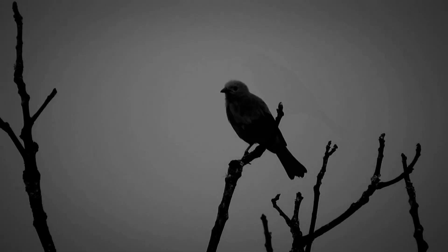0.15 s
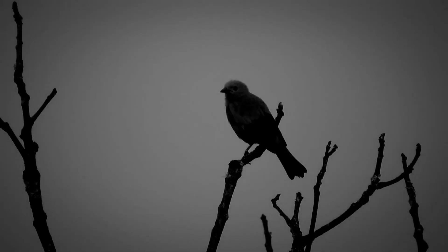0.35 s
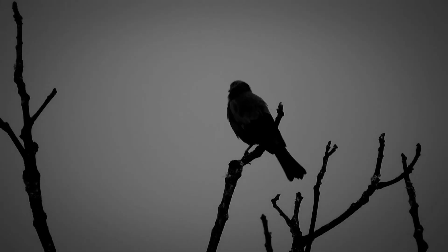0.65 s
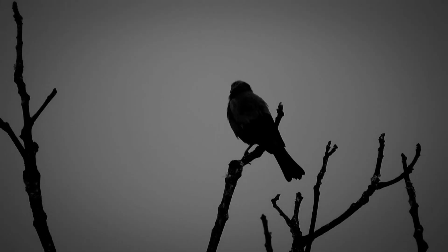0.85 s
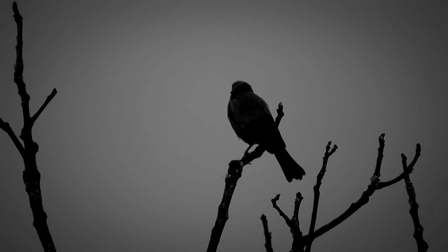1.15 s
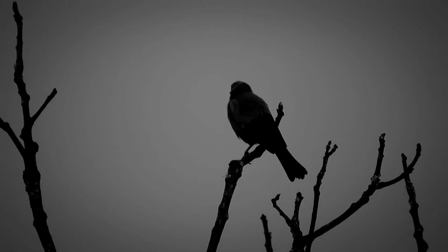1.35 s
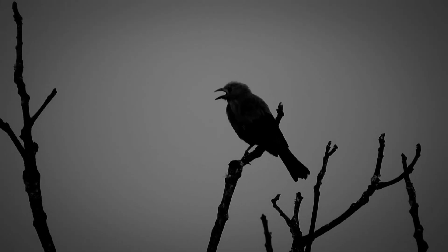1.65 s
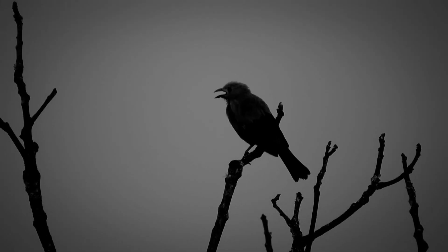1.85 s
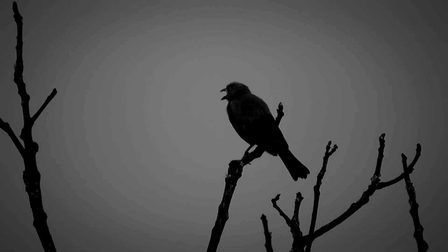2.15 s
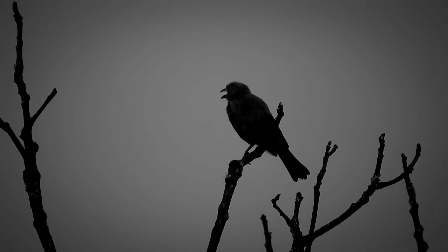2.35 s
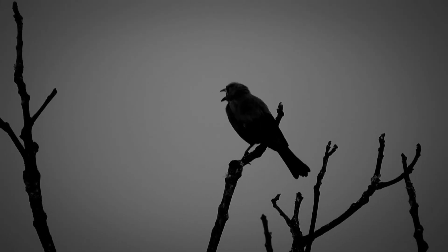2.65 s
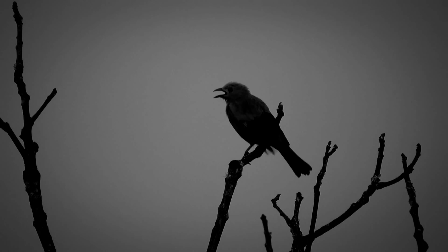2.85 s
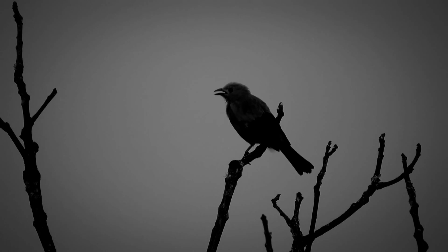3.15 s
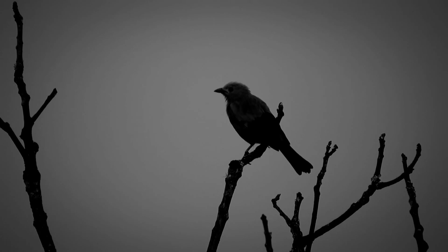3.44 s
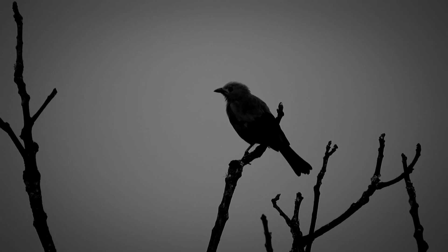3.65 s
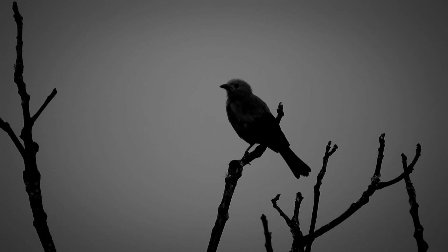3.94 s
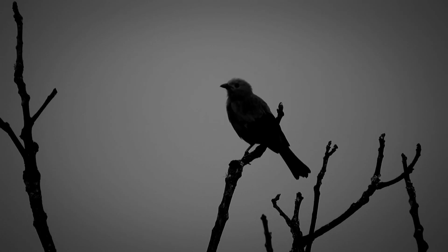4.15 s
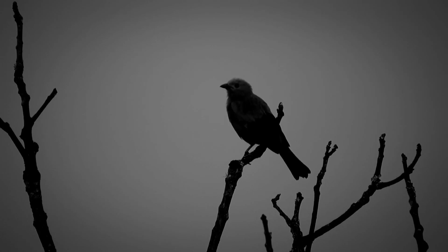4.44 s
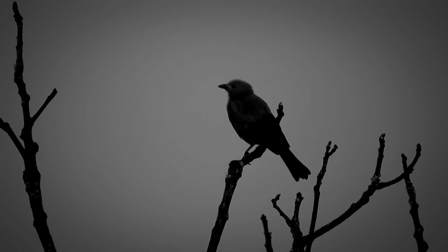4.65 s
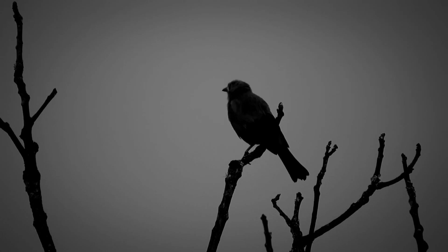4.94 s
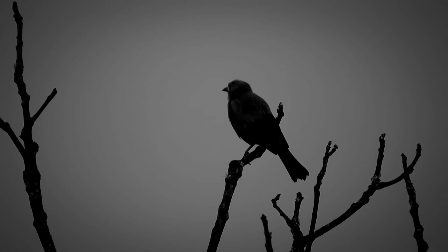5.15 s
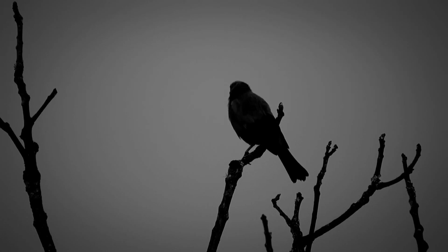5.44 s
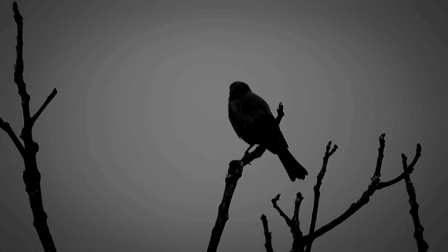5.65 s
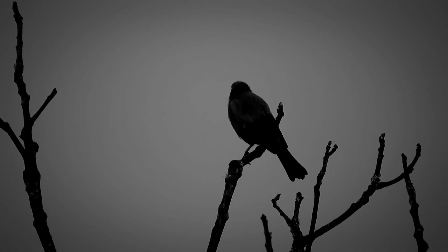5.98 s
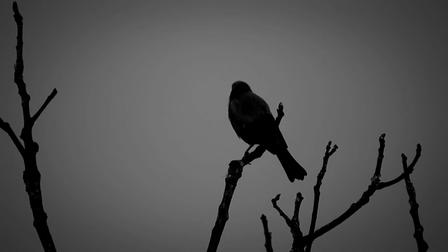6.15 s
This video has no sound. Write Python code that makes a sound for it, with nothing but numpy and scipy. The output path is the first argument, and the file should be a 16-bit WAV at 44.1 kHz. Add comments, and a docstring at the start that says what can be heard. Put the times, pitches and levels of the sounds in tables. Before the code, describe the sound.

Two rattling trills of short, piercing chirps from a nearby small bird, split by a pause with sharp ticks, above a faint hum.

```python
"""Outdoors among foliage, one microphone close to a prinia, over a low rumble and a faint hum.
The bird sings two runs of about nine notes a second, each a steep downward whistle of some 40 ms
made as its syrinx slackens. In the pause come three sharp ticks and a few slower notes, and
another bird calls faintly far off. The surroundings scatter each note into a short tail."""
import sys
import numpy as np
from scipy import signal
from scipy.fft import rfft, irfft
from scipy.io import wavfile
from scipy.ndimage import map_coordinates

SR = 44100
rng = np.random.default_rng(int(sys.argv[2]) if len(sys.argv) > 2 else 0)


def waveform_to_disk(signal):
    """Save audio, clipped to [-1, 1], as 16-bit WAV at the path in sys.argv[1]."""
    frames = np.transpose(np.atleast_2d(signal))
    scaled = np.clip(frames, -1, 1) * 32767
    samples = np.round(scaled).astype(np.int16)
    wavfile.write(sys.argv[1], SR, samples)


N = 278271
TIME = np.arange(N) / SR


def from_db(db):
    """Decibels to gain."""
    return 10 ** (np.asarray(db) / 20)


def rms_one(x):
    """Scale to unit power."""
    return x / np.sqrt(np.mean(x ** 2) + 1e-20)


def at_hz(points, hz):
    """Gain from rows of frequency_hz, gain_db, read on a log-frequency axis."""
    freqs, levels = np.transpose(points)
    return from_db(np.interp(np.log(np.maximum(hz, 1)), np.log(freqs), levels))


def add(track, start_s, sound):
    """Mix a sound into the track from start_s on."""
    first = int(round(start_s * SR))
    sound, first = sound[max(-first, 0):], max(first, 0)
    track[first:first + len(sound)] += sound[:max(N - first, 0)]


def wobble(t, rate_hz):
    """Smooth random drift with a spread of about 1 over the times t."""
    return map_coordinates(rng.standard_normal(1024), [t * rate_hz], order=3, mode="wrap")


def coloured(x, spectrum):
    """Filter a sound by rows of frequency_hz, gain_db."""
    hz = np.arange(len(x) // 2 + 1) * SR / len(x)
    return irfft(rfft(x) * at_hz(spectrum, hz), len(x))


def coloured_noise(spectrum, size=N):
    """Steady noise with the given spectrum, rms 1."""
    return rms_one(coloured(rng.standard_normal(size), spectrum))


# Low rumble of the place: frequency_hz, relative_db
RUMBLE_SPECTRUM = [(20, 8), (35, 0), (60, 1.5), (95, -1.5), (140, -2.5), (200, -0.5), (265, -1), (330, -11),
                   (420, -12.5), (800, -17), (1100, -14), (1900, -23.5), (3000, -70.5)]
# Soft hiss above it: frequency_hz, relative_db
HISS_SPECTRUM = [(1500, -8), (1900, -9.5), (2400, 1), (3100, -4.5), (4400, -10.5), (6500, -17.5),
                 (8500, -11.5), (10000, -22.5), (12500, -29), (15500, -23.5)]
# Tones of the faint hum at the microphone: pitch_hz, rms_db
HUM_TONES = [(65, -62), (116, -66), (168, -66), (666, -73.5), (700, -85), (1141, -77.5), (1357, -76),
             (1522, -77)]


def background(rumble_db=-51, hiss_db=-59.5, waver_db=-1.5):
    """The bed of the place: low rumble, soft hiss and a slightly wavering hum."""
    rumble = from_db(rumble_db) * coloured_noise(RUMBLE_SPECTRUM)
    hiss = from_db(hiss_db) * coloured_noise(HISS_SPECTRUM)
    hum = np.zeros(N)
    for hz, rms_db in HUM_TONES:
        amplitude = np.sqrt(2) * from_db(rms_db + waver_db * wobble(TIME, 5))
        hum += amplitude * np.sin(2 * np.pi * hz * TIME + wobble(TIME, 1.8))
    return rumble + hiss + hum


# Nearby surfaces, whose echoes beat against the diving pitch, before and after the bird turns:
# typical_delay_s, before_db, after_db
REFLECTIONS = [(.0017, -20, -12), (.008, -19, -17)]


def outdoors(x, turned=False, build_up_s=0.00447):
    """The way to the microphone: direct sound, two close reflections and a tail of dense scatter."""
    t = np.arange(2 ** 14) / SR
    build_up = 1 - np.exp(-(t / build_up_s) ** 2)
    response = np.zeros(len(t))
    for relative_db, t60_s in ((-16, 0.0454), (-18, 0.23), (-35, 0.595)):   # near, farther, distant
        scatter = rng.standard_normal(len(t)) * from_db(-60 * t / t60_s) * build_up
        response += from_db(relative_db) * scatter / np.linalg.norm(scatter)
    scatter_colour = [(1500, 7.5), (3000, 6), (4500, 4.5), (6000, 2), (9000, 7.5), (15000, -5)]
    response = coloured(response, scatter_colour)
    response[0] += 1   # direct sound
    for delay_s, before_db, after_db in REFLECTIONS:
        arrival = int(delay_s * rng.uniform(.8, 1.2) * SR)
        response[arrival] += from_db(after_db if turned else before_db)
    return signal.fftconvolve(x, response)


# A second bird, far from the microphone: start_s, length_s, open_hz, close_hz, level_db
FAR_BIRD_CALLS = [(2.52, 0.3, 2120, 2376, -57), (2.632, 0.16, 5200, 5590, -66.5),
                  (3.031, 0.11, 2630, 2480, -63), (3.138, 0.15, 2780, 2710, -55.5)]


def far_bird(waver=0.022, blur=0.71, harmonics_db=(0, -13, -17)):
    """Thin, nearly level calls; many paths through the foliage make them fade in and out quickly."""
    out = np.zeros(N)
    for start_s, length_s, open_hz, close_hz, level_db in FAR_BIRD_CALLS:
        t = np.arange(int(length_s * SR)) / SR
        hz = np.interp(t, [0, length_s], [open_hz, close_hz]) * (1 + waver * wobble(t, 420))
        phase = 2 * np.pi * np.cumsum(hz) / SR
        wave = np.zeros(len(t))
        for multiple, partial_db in enumerate(harmonics_db, 1):
            paths = .5 + blur * (wobble(t, 180) + 1j * wobble(t, 210))
            carries = multiple * hz < 9000   # the air swallows the top
            wave += from_db(partial_db) * np.real(paths * np.exp(1j * multiple * phase)) * carries
        add(out, start_s, from_db(level_db) * np.sin(np.pi * t / length_s) * wave)
    return out


# Faint high sounds: tiny ticks, soft puffs, a rustle and a thin high twitter near the end:
# middle_s, level_db, centre_hz, half_width_s
FAINT_HIGH_SOUNDS = [(2.663, -63, 9350, 0.011), (2.742, -62, 8820, 0.0087), (2.772, -59.5, 7500, .006),
                     (2.942, -68.5, 10500, .008), (2.939, -63, 4210, 0.031), (3.055, -57.5, 4000, 0.029),
                     (4.424, -67, 9700, 0.29), (6.206, -66, 11800, 0.22)]


def faint_high_sounds(sharpness=9.7):
    """Each is a narrow band of noise that swells and fades; the shortest are heard as tiny ticks."""
    out = np.zeros(N)
    for middle_s, level_db, centre_hz, half_width_s in FAINT_HIGH_SOUNDS:
        band = signal.lfilter(*signal.iirpeak(centre_hz, sharpness, fs=SR), rng.standard_normal(N))
        swell = np.exp(-2 * ((TIME - middle_s) / half_width_s) ** 2)
        out += from_db(level_db) * rms_one(band) * swell
    return out


# The close bird's ticks between its two runs: start_s, peak_db
PRINIA_TICKS = [(2.8458, -31), (3.4375, -22.5), (4.1757, -21)]


def ticks(open_hz=7200, close_hz=1400, length_s=0.006, second_db=-21, puff_db=-24, puff_s=0.0099):
    """A tick is a fast downward chirp lasting a few milliseconds, inside a soft puff."""
    chirps, puffs = np.zeros(N), np.zeros(N)
    share = np.arange(int(length_s * SR)) / (length_s * SR)
    hz = open_hz * (close_hz / open_hz) ** share
    phase = 2 * np.pi * np.cumsum(hz) / SR
    chirp = np.sin(np.pi * share) ** 4 * (np.sin(phase) + from_db(second_db) * np.sin(2 * phase))
    for start_s, peak_db in PRINIA_TICKS:
        add(chirps, start_s, from_db(peak_db) * chirp)
        puffs += from_db(peak_db + puff_db) * np.exp(-((TIME - start_s - length_s / 2) / puff_s) ** 2)
    puff_colour = [(1500, -17), (2700, 13), (4500, 4), (6500, -3), (8500, -11), (13000, -25)]
    return chirps + puffs * coloured_noise(puff_colour)


FADE_AT, KNEE_AT = .2, .55   # shares of a note's length: the fade begins, the last drop begins


def dive(share, open_hz, knee_fade_db, halfway_share=0.24, drop_hz=1350, sag_hz_per_db=17.5):
    """Pitch of a note as the syrinx slackens: a steep dive, a rest at the knee, a last drop."""
    # a note that opens lower or fades more also rests lower
    rest_hz = 2786 + .1 * (open_hz - 6200) - sag_hz_per_db * knee_fade_db
    tension = 1 / (1 + (share / halfway_share) ** 2.453)
    letting_go = np.interp(share, [KNEE_AT, 1], [0, 1]) ** 1.75
    return rest_hz + (open_hz - rest_hz) * tension - drop_hz * letting_go


def envelope(t, length_s, attack_s=0.0048, hold_share=0.28):
    """Level of a note: a quick attack, a short hold and a rounded release."""
    attack = 1 - np.exp(-(t / attack_s) ** 1.83)
    release = np.cos(np.pi / 2 * np.interp(t / length_s, [hold_share, 1], [0, 1])) ** 1.85
    return attack * release


# How throat and beak pass the overtones: frequency_hz, gain_db
BEAK_RESPONSE = [(800, -10), (2000, 2), (5500, -11), (6800, -4), (8500, 5), (10000, -6.5), (12800, -10.5),
                 (15500, -1)]
# Rush of air through the syrinx, heard at close range: frequency_hz, relative_db
RASP_SPECTRUM = [(1000, -11), (4000, 0.5), (7000, -2.5), (9000, -3), (11000, -7), (13000, -13), (15500, -9)]


def whistle(level_db, length_s, open_hz, knee_fade_db, second_db, third_db,
            jitter=0.0033, flutter=0.028, shimmer_db=1.13, side_db=-2, rasp_db=-7, mellowing_db=25):
    """One note from the syrinx: a diving tone with weak overtones and a thin rasp of air."""
    t = np.arange(int(length_s * SR)) / SR
    share = t / length_s
    # past the knee the slack membrane flutters in pitch and level
    slack = np.interp(share, [KNEE_AT, .8], [0, 1]) * wobble(t, 426.5)
    hz = dive(share, open_hz, knee_fade_db) * (1 + jitter * wobble(t, 599.3) + flutter * slack)
    effort_db = level_db - np.interp(share, [FADE_AT, KNEE_AT], [0, knee_fade_db])
    level = envelope(t, length_s) * from_db(effort_db + shimmer_db * wobble(t, 387) + 2.4 * slack)
    # a weak slower vibration dives even faster and puts side tones beside the harmonics
    side_hz = 2000 * (hz / 6000) ** 2.6
    side_tones = (side_hz, hz + side_hz, 2 * hz - side_hz)
    fade_db = mellowing_db * np.maximum(share - FADE_AT, 0)   # the tone gets purer as the tension goes
    partials = [(2 * hz, second_db - fade_db), (3 * hz, third_db)]
    partials += [(tone_hz, third_db + side_db - fade_db) for tone_hz in side_tones]
    wave = np.sin(2 * np.pi * np.cumsum(hz) / SR)
    for tone_hz, partial_db in partials:
        strength = from_db(partial_db + 3.7 * wobble(t, 400))
        passed = at_hz(BEAK_RESPONSE, tone_hz) * (tone_hz < SR / 2)
        wave += strength * passed * np.sin(2 * np.pi * np.cumsum(tone_hz) / SR)
    rasp = from_db(third_db + rasp_db) * coloured_noise(RASP_SPECTRUM, size=len(t))
    return level * (wave + rasp)


# The prinia's notes, close to the microphone: start_s, level_db, length_s
SONG_NOTES = [(-.07, -13.5, .048), (0.039, -16, 0.048), (.1457, -16, .043), (0.254, -15, 0.048),
              (0.3665, -13, 0.046), (0.471, -9.5, 0.043), (.58, -7, 0.04), (.688, -6, .041),
              (0.798, -6, 0.04), (.9059, -5.5, .042), (1.0123, -6, 0.043), (1.1237, -6, 0.043),
              (1.2301, -6.5, .044), (1.339, -6, .042), (1.4505, -6.5, .041), (1.5576, -7, 0.042),
              (1.6619, -7, 0.043), (1.7747, -10, 0.04), (1.8849, -10, .04), (3.558, -12.5, 0.038),
              (3.744, -8, 0.04), (4.299, -10, 0.037), (4.445, -12.5, .043), (4.601, -14, 0.044),
              (4.743, -12, .044), (4.8628, -9.5, 0.042), (4.972, -10, 0.047), (5.0825, -9.5, 0.043),
              (5.189, -9, .046), (5.296, -8, 0.05), (5.402, -8, .047), (5.513, -8, 0.047),
              (5.623, -7, 0.043), (5.736, -7.5, 0.044), (5.8491, -9, 0.045), (5.9534, -10, .048),
              (6.058, -12, .047), (6.1735, -11.5, .046), (6.2828, -14, 0.043)]
# Its voice drifting along each run; harmonics are relative to the note, ahead of throat and beak:
# time_s, open_hz, knee_fade_db, second_harmonic_db, third_harmonic_db
SONG_VOICE = [(.04, 6230, -2.5, -21.5, -30.5), (.26, 6310, -2.5, -18.5, -30), (.47, 6550, 1, -24, -33.5),
              (.69, 6207, 3, -34.5, -34.5), (1.12, 6217, 5.5, -35, -34.5), (1.66, 6240, 5.5, -30.5, -33),
              (1.77, 6320, 1.5, -32.5, -40), (3.56, 5026, -2, -18.5, -38.5), (3.74, 5310, 1.5, -24, -40),
              (4.3, 5250, 2, -30, -42.5), (4.45, 5584, 0.5, -31.5, -34.5), (4.86, 5687, 2, -32.5, -35.5),
              (5.08, 6036, 1.5, -30, -35.5), (5.3, 6016, 7, -36, -36.5), (5.7, 5973, 10.5, -38.5, -37),
              (6.061, 6036, 4, -30, -35), (6.28, 6320, -1, -29, -32.5)]


def thumps(gain_db=-33, length_s=.03):
    """A soft low thump under each note; it grows with the note's power, so the loudest stand out."""
    out = np.zeros(N)
    share = np.arange(int(length_s * SR)) / (length_s * SR)
    push = np.sin(2 * np.pi * share) * np.sin(np.pi * share)
    for start_s, level_db, _ in SONG_NOTES:
        add(out, start_s, from_db(gain_db + 2 * level_db) * push)
    return out


def prinia_song(turn_s=3):
    """The close bird's whistles; it moves its head, so each one scatters in its own way."""
    out = np.zeros(N)
    times, *controls = np.transpose(SONG_VOICE)
    for start_s, level_db, length_s in SONG_NOTES:
        voice = [np.interp(start_s, times, control) for control in controls]
        note = whistle(level_db, length_s, *voice)
        add(out, start_s, outdoors(note, turned=start_s > turn_s))
    return out


def scene():
    """The birds, their echoes and the background, as they reach one microphone."""
    small_sounds = outdoors(ticks() + faint_high_sounds() + far_bird())[:N]
    return (prinia_song() + thumps() + small_sounds + background())[None]


def record(dry, cutoff_hz=15700):
    """A steep low-pass after the microphone cuts the highest treble."""
    return signal.sosfilt(signal.ellip(10, .1, 70, cutoff_hz, fs=SR, output="sos"), dry)


dry = scene()
out = record(dry)
waveform_to_disk(out)
```